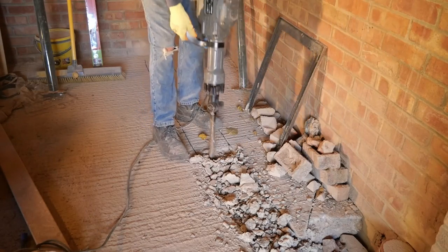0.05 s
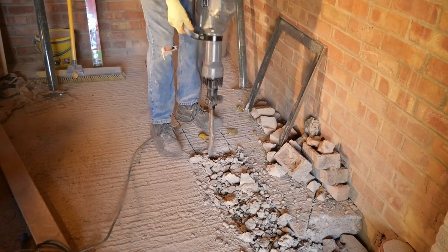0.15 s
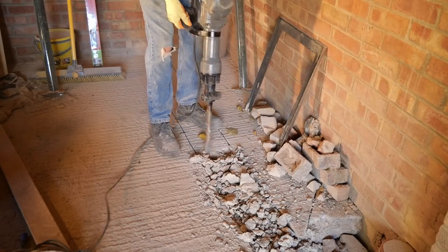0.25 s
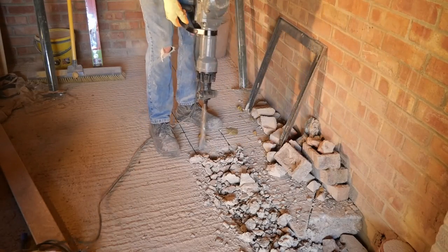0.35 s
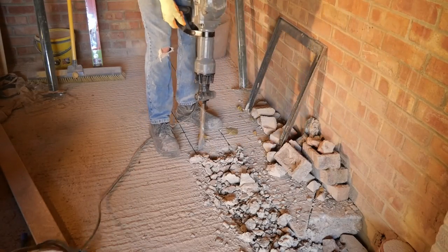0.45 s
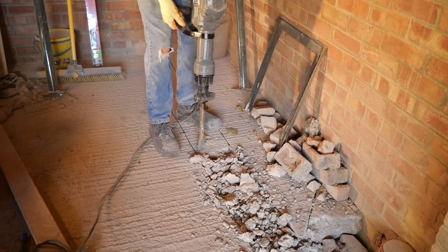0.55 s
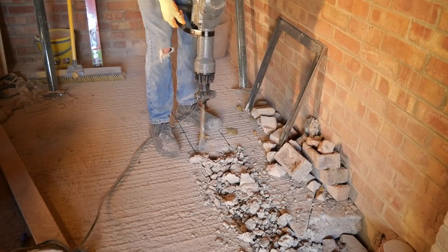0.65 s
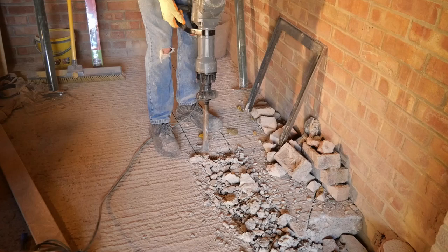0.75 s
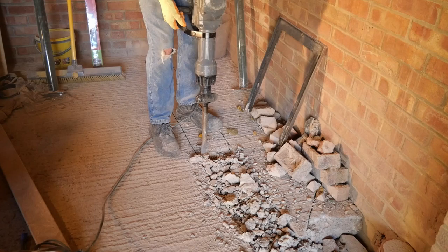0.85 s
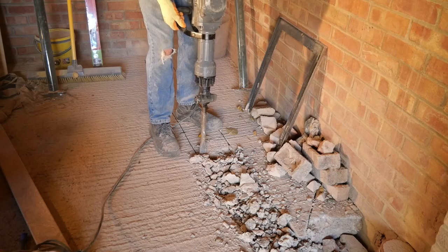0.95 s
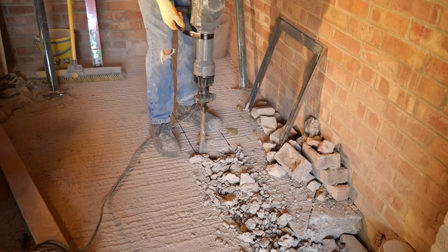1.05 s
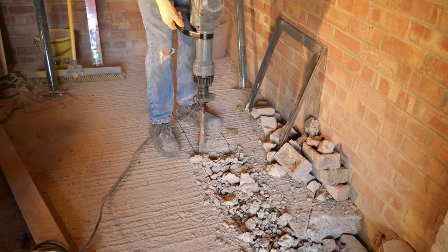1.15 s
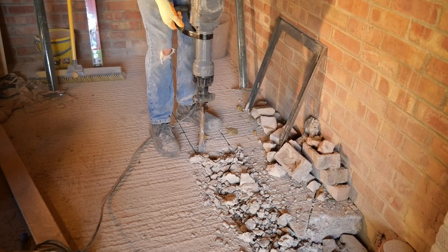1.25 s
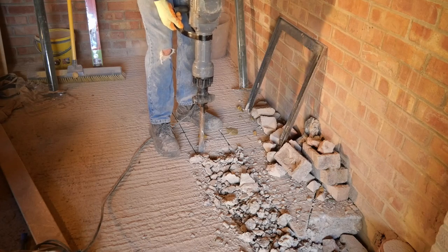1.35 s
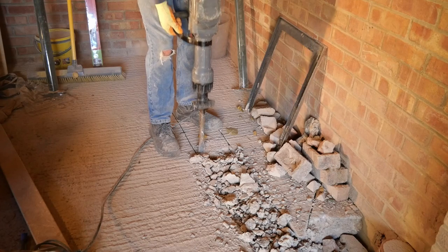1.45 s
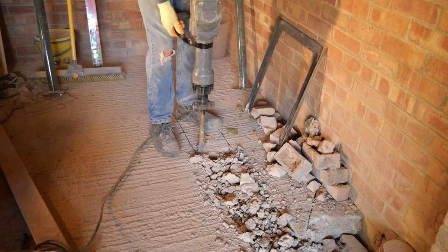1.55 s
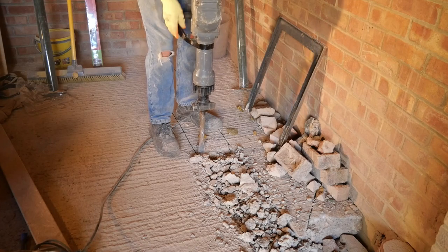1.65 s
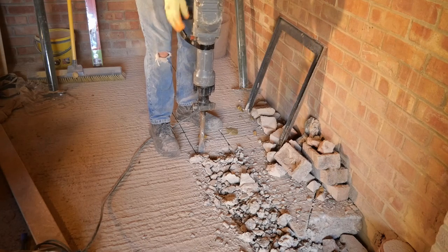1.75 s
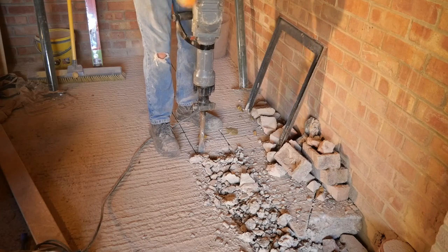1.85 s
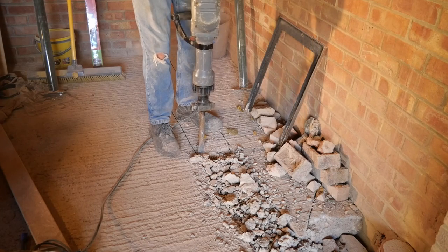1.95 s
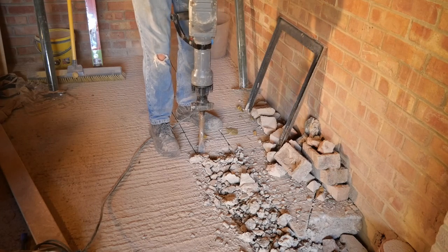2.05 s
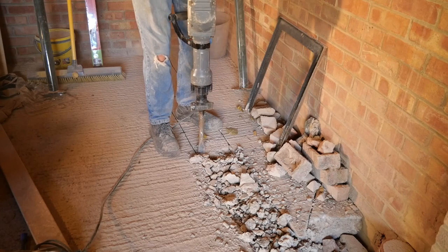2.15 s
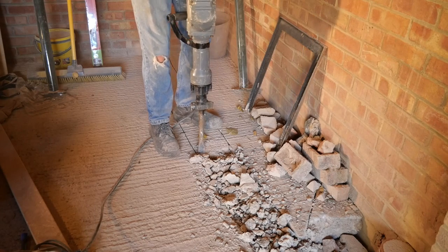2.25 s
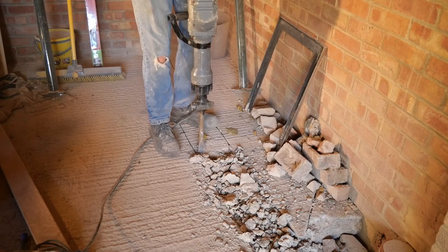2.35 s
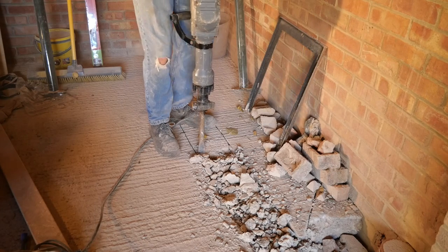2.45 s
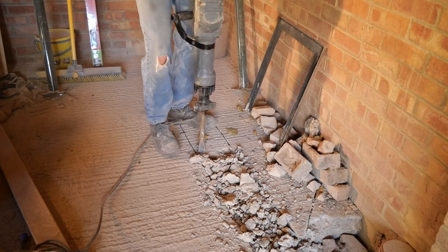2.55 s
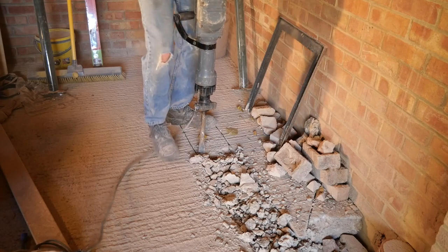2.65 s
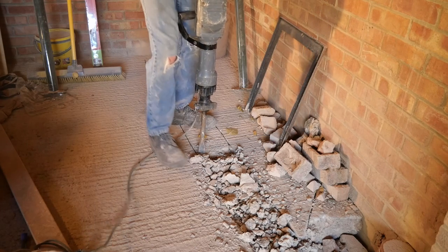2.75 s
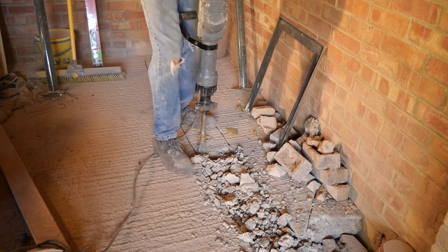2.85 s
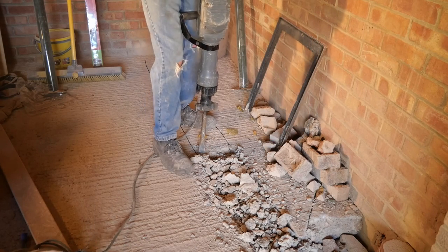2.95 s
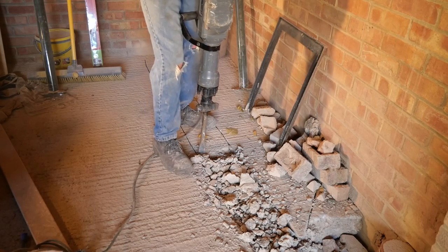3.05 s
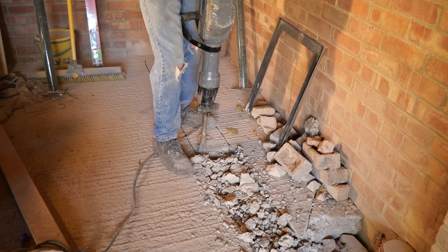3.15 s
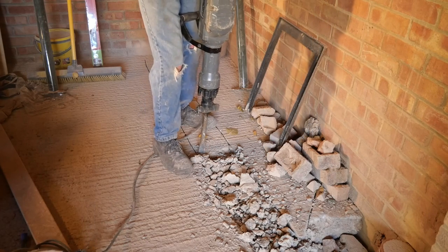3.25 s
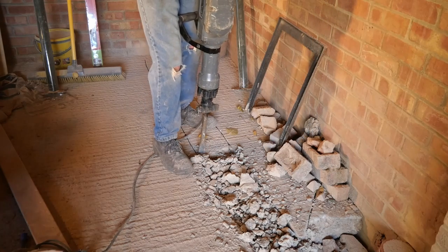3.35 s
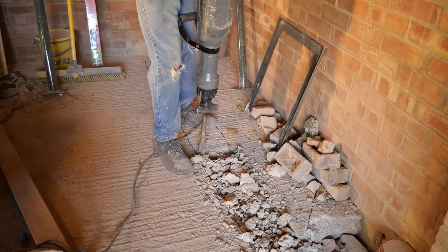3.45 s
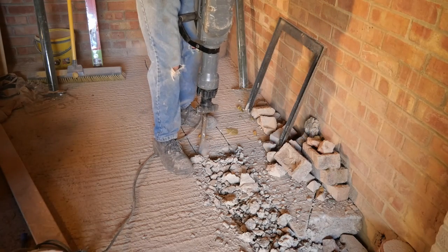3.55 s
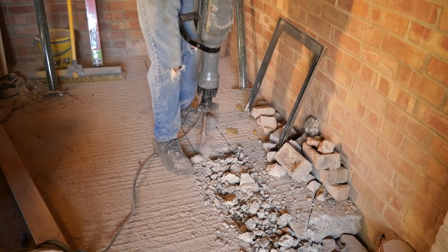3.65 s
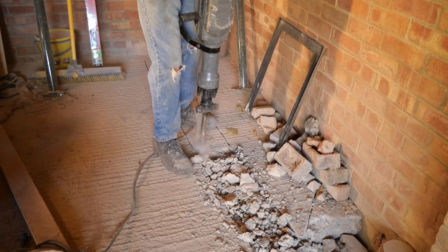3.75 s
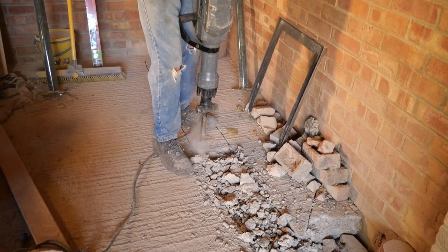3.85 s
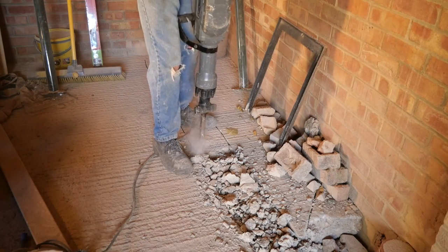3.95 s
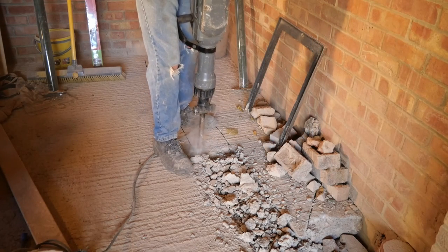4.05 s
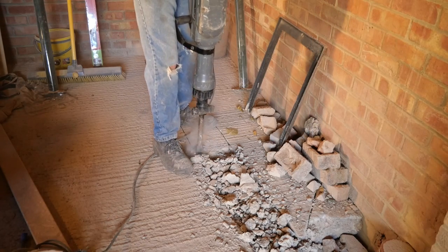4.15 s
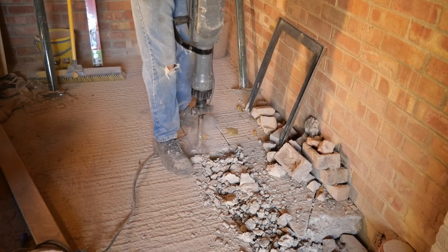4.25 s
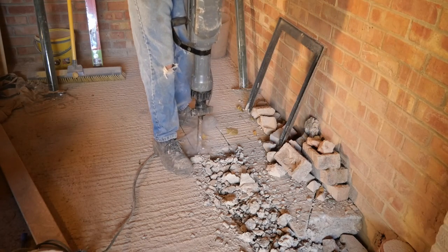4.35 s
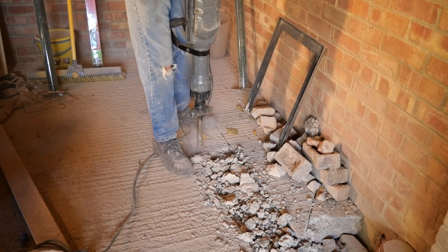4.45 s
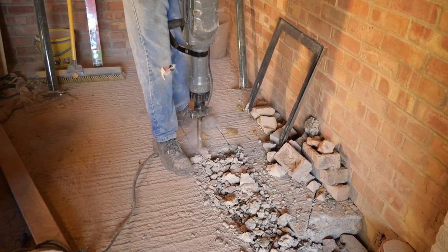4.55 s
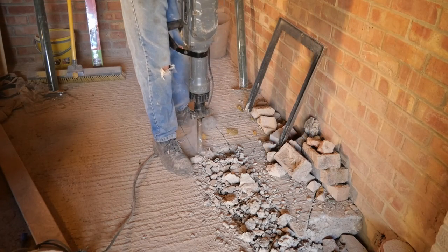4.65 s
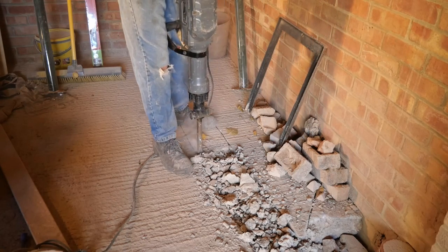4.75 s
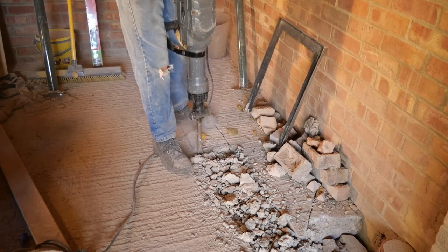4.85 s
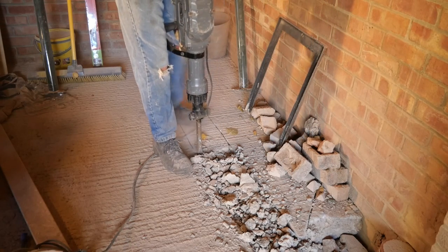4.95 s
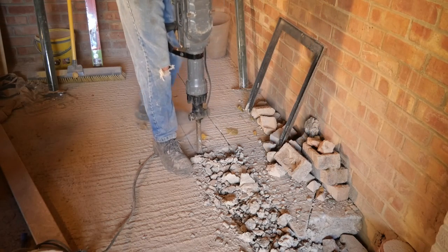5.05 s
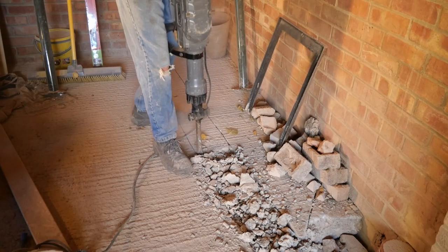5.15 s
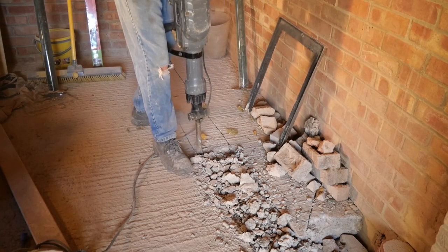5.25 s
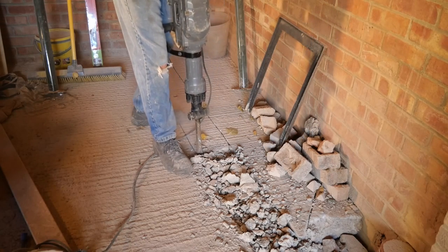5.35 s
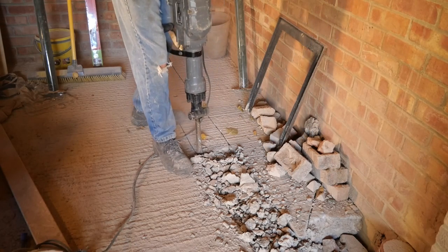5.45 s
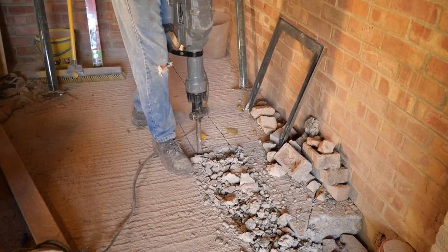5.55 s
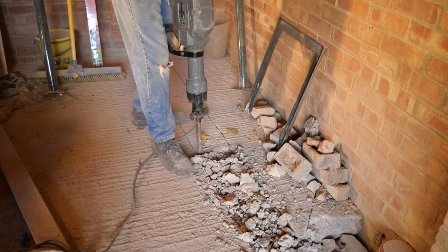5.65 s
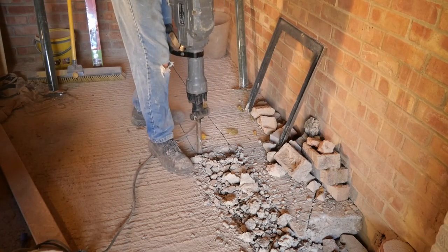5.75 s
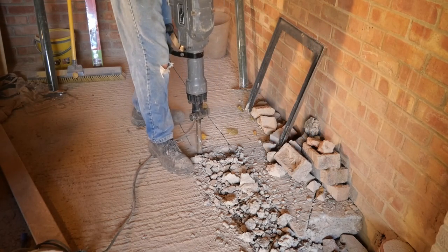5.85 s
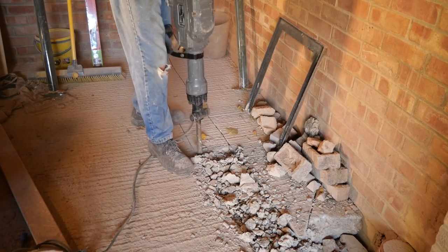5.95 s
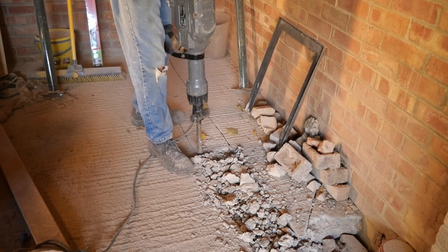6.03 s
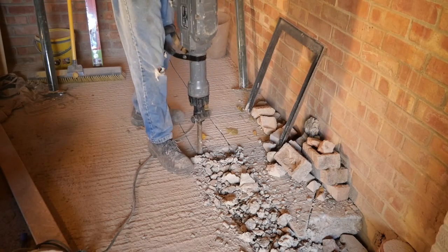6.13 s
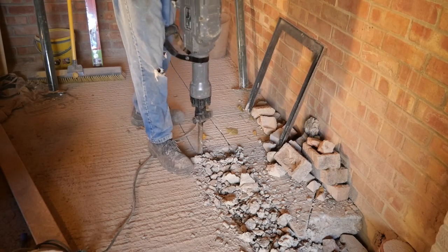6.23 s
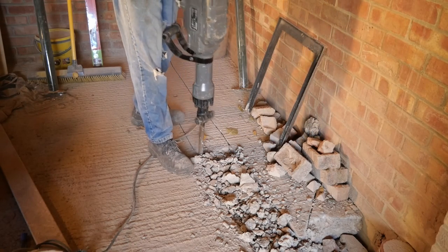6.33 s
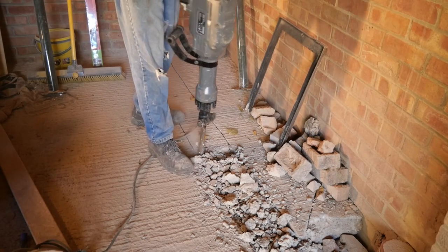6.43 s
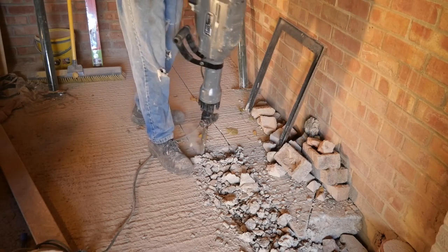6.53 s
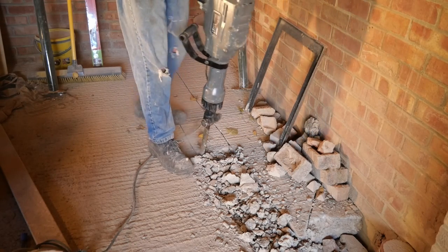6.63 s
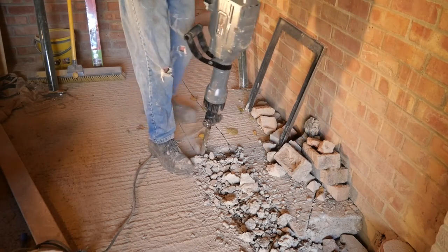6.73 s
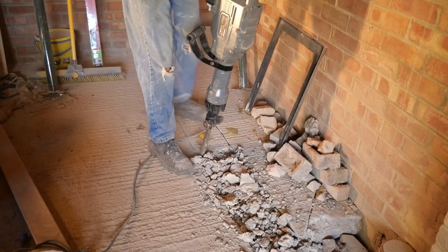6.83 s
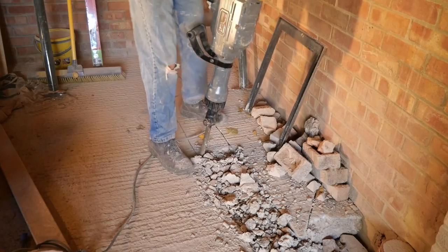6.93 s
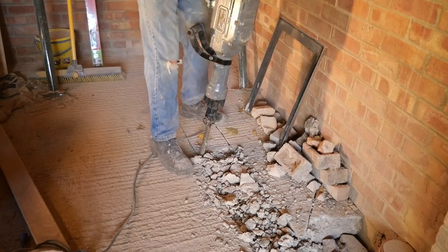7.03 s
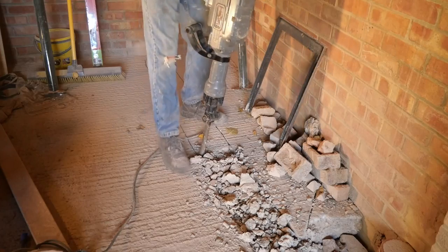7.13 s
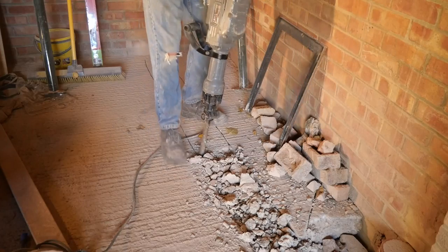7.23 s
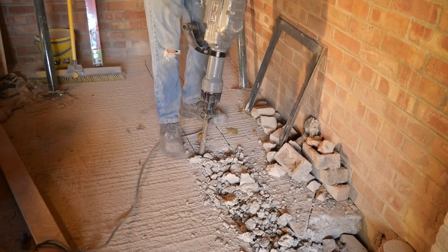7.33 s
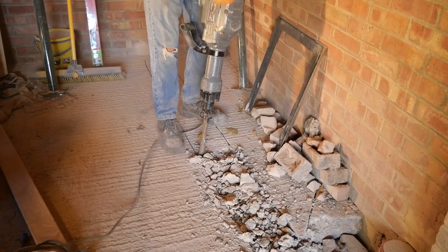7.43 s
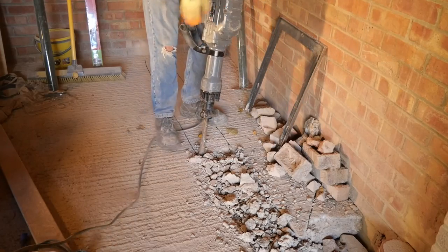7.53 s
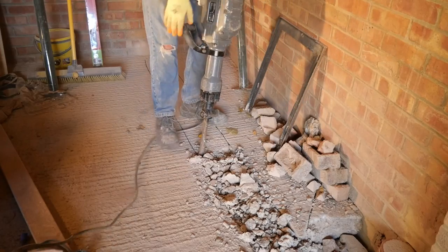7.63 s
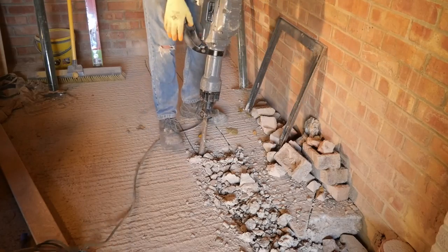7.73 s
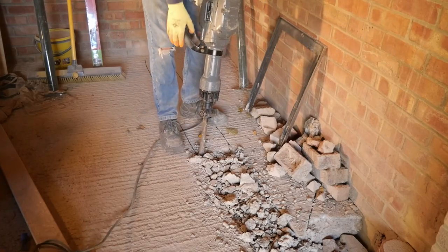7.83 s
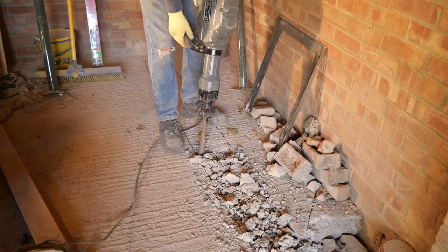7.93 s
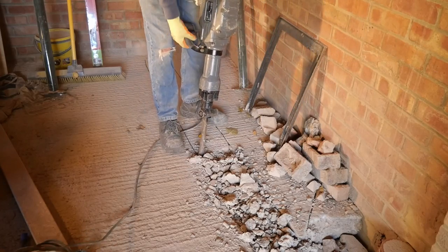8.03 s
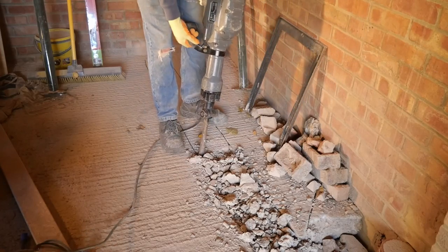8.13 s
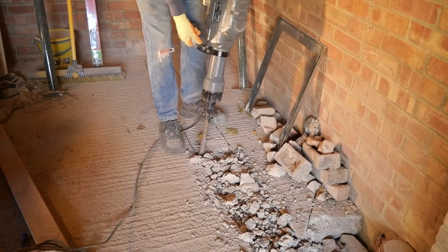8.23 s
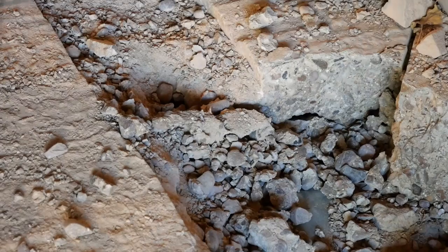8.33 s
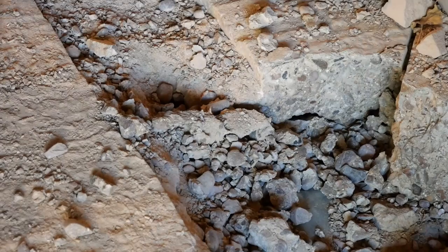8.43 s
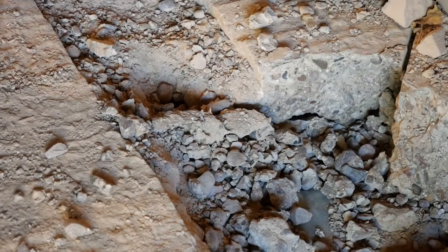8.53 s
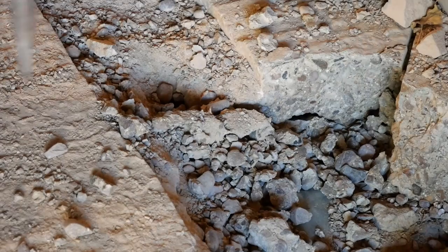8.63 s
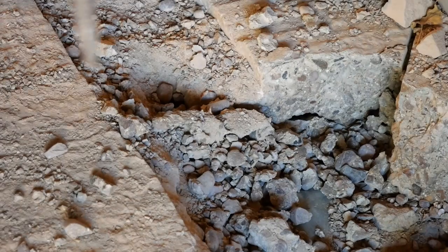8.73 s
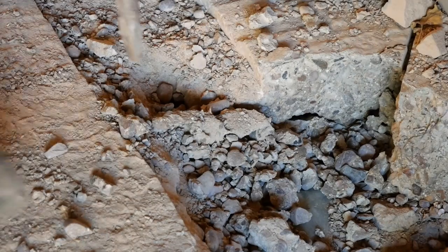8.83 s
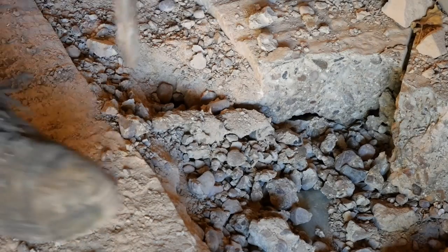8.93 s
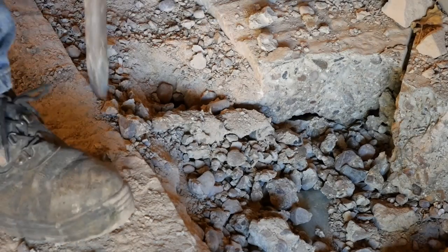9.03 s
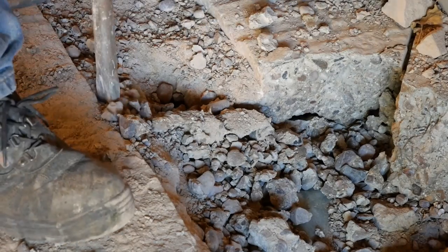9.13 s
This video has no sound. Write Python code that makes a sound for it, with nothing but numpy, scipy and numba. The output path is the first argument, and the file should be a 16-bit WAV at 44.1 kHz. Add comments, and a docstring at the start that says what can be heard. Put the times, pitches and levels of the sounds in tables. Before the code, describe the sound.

From 0 to 1.3 s, small dry gritty knocks and ticking stone chips, some with a light steel ping, as a breaker is shifted on a concrete floor in a brick garage; faint low hum beneath. At 1.55 s a much louder clack with a low thump. Sparse faint taps follow while the hum swells until 3.35 s. At 3.4 s sharp clunks and a very short motor groan near 500 Hz, then heavy first blows accelerate. From 3.6 to 6.8 s steady hammering, about 25 blows a second, thudding slab, ringing chisel, gear and fan noise, a thin faint squeal around 5 kHz. Blows slow from 6.8 to 7.35 s and stop. A knock at 7.6 s, then near silence with tiny fluttering ticks. From 8.35 s, closer, gravel slides; lumps crack at 8.45-8.6 s, crackling, and again more strongly at 8.95-9.15 s. Short, hard room reverberation.

```python
"""In a brick garage, an electric breaker is shifted about on the floor: gritty impacts over a swelling hum.
The motor groans into motion and a piston excites slab and chisel modes about 25 times a second, then slows.
Last, from closer, rubble is raked and cracks: filtered noise, random grains and short damped bursts.
Sparse decaying echoes form the room, and a noise gate lowers the quiet gaps, where short ticks imitate
its brief flutter."""
import sys
import numpy as np
from scipy import signal
from scipy.fft import rfft, irfft
from scipy.io import wavfile
from scipy.ndimage import uniform_filter1d
from numba import njit

SR = 44100
rng = np.random.default_rng(int(sys.argv[2]) if len(sys.argv) > 2 else 0)


def to_wav(sig):
    """Store sig (one row per channel, or 1-D mono) as 16-bit WAV at the path in sys.argv[1].

    Samples outside -1..1 are clipped; the rate is SR.
    """
    pcm = np.clip(np.atleast_2d(sig), -1, 1) * 32767
    pcm = np.round(pcm).astype(np.int16)
    wavfile.write(sys.argv[1], SR, pcm.T)  # frames by channels


N = 404838
T = np.arange(8192) / SR  # time axis of one short event [s]

# All levels in the tables are relative.
# hum and air of the garage: (time [s], hum level [dB], air level [dB])
QUIET_LEVELS = [(0, -74.5, -75.5), (.6, -71.5, -79), (1.2, -71.5, -79), (1.7, -76, -65), (2, -69, -74),
                (2.4, -66, -70.5), (2.9, -62.5, -67), (3.35, -53, -66), (3.6, -77.5, -72), (7, -84, -75.5),
                (7.7, -91.5, -76.5), (9.18, -100, -67.5)]
# mains hum partials: (frequency [Hz], level [dB])
HUM_PARTIALS = [(61.5, -12.5), (123, 0.5), (183, -16.5), (245, -20), (367, -15.5), (480, -22)]
# spectrum of the garage air: (frequency [Hz], level [dB])
AIR_SPECTRUM = [(18, -47), (30, -35), (64, -35), (88, -25.5), (122, -14.5), (253, -16.5), (368, -16),
                (623, -19), (4400, -36.5), (12000, -51), (15600, -100), (22000, -120)]
# knocks of chisel and boots, clunks of the starting motor, and the last blow: (time [s], level [dB],
# stone note [Hz], note above the grit [dB], low thump [dB], chisel ring [dB])
KNOCKS = [(0.086, -39, 1145, -9, -82, -73), (0.1, -38.5, 2490, -6, -81, -45.5),
          (0.138, -37.5, 2650, -7, -82, -66), (0.178, -51, 3080, 7, -84, -52),
          (0.36, -49, 790, -11, -79, -63), (0.448, -52, 2320, 0, -79, -60),
          (0.461, -37, 2330, -4, -59, -57), (0.534, -45, 2420, 5, -84, -60),
          (0.716, -41, 2320, -2, -74, -69), (0.73, -35.5, 2930, 7, -83, -59),
          (0.74, -32, 2180, -23, -85, -49), (0.941, -39, 4500, 4, -56, -43),
          (0.97, -34.5, 4600, 8, -55.5, -41), (1.01, -35, 4730, 0, -60, -46),
          (1.044, -33.5, 4440, 12, -69, -27.5), (1.056, -54, 4430, -2, -52, -52),
          (1.245, -51, 800, -2, -68, -68), (1.258, -43.5, 2850, 3, -68, -66),
          (1.499, -38, 2740, 4.5, -57, -77), (1.55, -16, 1990, -6, -27.5, -31),
          (2.108, -51.5, 2020, 2, -65, -75), (2.191, -42.5, 710, 10, -56.5, -83),
          (2.659, -51.5, 1370, 8, -60, -85), (2.843, -60, 720, 14, -52, -82),
          (2.937, -50, 704, 6, -37.5, -69), (3.396, -13.5, 4230, 3, -44, -34),
          (3.403, -16, 2900, 5, -67, -50), (3.425, -12, 4100, 3, -37, -44), (7.484, -43, 2600, 6, -75, -53),
          (7.611, -26.5, 3200, 0, -47.5, -40), (8.013, -65, 2000, -8, -85, -91),
          (8.058, -65, 1472, -6, -90, -90), (8.237, -52.5, 3220, -1, -78.5, -83.5)]
# first two blows on unbroken concrete, short and heavy: same columns as KNOCKS
FIRST_BLOWS = [(3.449, -4, 773, 9.2, -40.5, -56.5), (3.515, -12, 932, 10, -33.5, -56.5)]
# lumps of rubble cracking and tumbling: same columns as KNOCKS
LUMPS = [(8.423, -28.5, 1360, -8, -47, -65), (8.474, -18.5, 2440, 5, -36.5, -68),
         (8.512, -16.5, 2670, 7, -26, -65), (8.529, -23, 3050, 12.5, -34, -60),
         (8.548, -14, 3100, 7, -20.5, -34), (8.572, -11, 925, -20, -23.5, -34),
         (8.6, -13.5, 4250, 16, -52, -21), (8.608, -13, 1643, 4, -70, -27),
         (8.876, -27.5, 1450, 0, -50, -54), (8.958, -15, 1300, 3, -31.5, -75),
         (9.072, -12.5, 2190, -22, -33.5, -31), (9.11, -8, 2600, -15, -26, -26),
         (9.118, -11, 3540, 14.5, -44, -33.5), (9.134, -27.5, 1250, 19.5, -29, -54)]
# spectrum of stone on stone: (frequency [Hz], level [dB])
GRIT_SPECTRUM = [(250, -22.5), (700, 1.5), (2500, 2.5), (5000, -10), (10000, -23), (14000, -61.5)]
# stone chips ticking while things are shifted: (start [s], end [s], level [dB])
CHIP_SPANS = [(0, .3, -66), (0.353, .64, -64.5), (0.717, .87, -73), (0.9, 1.21, -64), (2.62, 2.8, -70.5)]
# the gate's brief flutter in the silences, imitated by short ticks: (start [s], end [s], level [dB])
GATE_FLUTTER_SPANS = [(.67, .71, -58), (1.19, 1.24, -58), (1.33, 1.49, -60), (7.74, 8.32, -58)]
# gravel crackling close by: (start [s], end [s], level [dB])
CRACKLE_SPANS = [(8.505, 8.66, -25), (8.95, 9.02, -41), (9.04, 9.18, -37)]
# motor groan on starting: (time [s], level [dB], pitch [Hz])
GROAN = [(3.394, -29, 492), (3.415, -26.5, 481), (3.432, -30, 500), (3.446, -31.5, 520),
         (3.452, -61.5, 515)]
# gears, fan and rattling chips: (time [s], level [dB])
MOTOR_LEVEL = [(3.394, -35), (3.45, -68), (3.6, -39.5), (4.2, -37), (5.3, -39), (6.3, -39.5), (6.8, -35.5),
               (7.1, -50), (7.4, -68), (7.75, -81)]
# their spectrum: (frequency [Hz], level [dB])
MOTOR_SPECTRUM = [(18, -67.5), (30, -23.5), (75, -17), (100, -24), (130, -11), (363, 3), (747, -8.5),
                  (917, 2), (1020, -5), (3970, -9.5), (4700, 0), (5700, -11.5), (6900, -11), (10300, -12),
                  (12300, -14), (14000, -91.5)]
# piston at full speed, each row on a blow, blows between rows evenly spaced: (time [s], strength [dB],
# low chisel ring [dB], ring of the 4.6 kHz mode [dB], high chisel ring [dB])
HAMMERING = [(3.61, -16, -31.5, -42, -23.5), (3.656, -20.5, -33.5, -41.5, -34),
             (3.695, -16.5, -45, -23, -27), (3.738, -29, -21.5, -45, -29), (3.818, -16.5, -34, -29, -30),
             (3.858, -20, -24, -30.5, -24), (3.938, -20.5, -24, -32.5, -30), (4.018, -18, -30, -29, -26),
             (4.137, -23.5, -27.5, -42, -27.5), (4.22, -26.5, -37, -44, -36), (4.261, -18.5, -36, -33, -31),
             (4.42, -20, -29.5, -43, -26.5), (4.535, -17.5, -42, -30, -31.5),
             (4.689, -18.5, -31, -39.5, -25.5), (4.768, -16.5, -24, -32, -27.5),
             (4.846, -25.5, -34.5, -33, -26.5), (4.884, -19, -27, -41, -26.5),
             (4.925, -18, -41, -49.5, -32), (4.965, -17, -30, -24, -30.5), (5.005, -17, -43, -37.5, -29.5),
             (5.125, -14.5, -59.5, -39.5, -32), (5.361, -13, -47, -52, -34.5),
             (5.56, -14.5, -40.5, -37.5, -31.5), (5.599, -14.5, -27.5, -37, -34.5),
             (5.642, -15.5, -34.5, -28, -29.5), (5.68, -14, -48, -46, -37), (5.838, -13.5, -33, -41, -26.5),
             (5.88, -16, -49, -43, -30.5), (5.998, -14, -36.5, -45.5, -33.5),
             (6.158, -14.5, -42, -39, -33.5), (6.199, -14.5, -26, -25.5, -32), (6.279, -15, -47, -42, -38),
             (6.32, -14.5, -36.5, -32, -27), (6.402, -24, -33, -42, -25), (6.442, -17, -30, -42, -31),
             (6.523, -16, -43, -55, -29), (6.772, -20, -36.5, -39, -29.5)]
# single blows while the motor speeds up and runs down: same columns as HAMMERING
SLOW_BLOWS = [(3.446, -16, -22.5, -30, -26.5), (3.513, -11.5, -25.5, -31, -28),
              (3.567, -19, -27.5, -28, -26), (6.824, -24.5, -33.5, -35.5, -30),
              (6.879, -21, -36.5, -38.5, -27.5), (6.947, -26, -45.5, -45.5, -26.5),
              (7.015, -18, -41, -45, -29), (7.097, -18.5, -36, -26.5, -28), (7.201, -20.5, -50, -40.5, -28),
              (7.339, -23.5, -47, -44, -44)]
# second knock as the striker rebounds: (time [s], level against the blow [dB])
REBOUND = [(3.4, -23), (3.7, -10), (4.5, -0.5), (5.2, -0.5), (6, -3.5), (6.8, -8), (7.4, -1)]
# how brittle the concrete under the point cracks: (time [s], level against the blow [dB])
BRITTLENESS = [(3.4, 1), (3.7, -28), (4.5, -10), (5.1, -12), (6.2, -7), (6.9, -9), (7.4, -4.5)]
# spectrum of the blow's thud: (frequency [Hz], level [dB])
THUD_SPECTRUM = [(24, -68.5), (40, -60), (75, -41.5), (100, -42.5), (125, -20.5), (163, -10), (326, -11.5),
                 (369, 1.5), (737, -7), (909, -7.5), (1010, -5), (4470, -9.5), (6000, -26), (7800, -57.5),
                 (13200, -120)]
# spectrum of cracking concrete: (frequency [Hz], level [dB])
CRACK_SPECTRUM = [(880, -42.5), (1500, 7), (1770, -18), (2040, 1.5), (4460, -0.5), (5950, -8), (7280, -4),
                  (10300, -23), (15000, -60)]
# steel bar modes: (frequency [Hz], width before stretching the decay [Hz], level [dB])
CHISEL_MODES = [(2420, 26, -5), (2485, 30, -8), (4297, 22, 0), (4375, 30, -6), (4647, 26, 0),
                (6437, 34, -7.5), (7050, 40, -10), (7212, 30, -8), (8940, 30, -7), (10028, 24, -8),
                (11920, 24, -9), (13700, 38, -20), (14750, 33, -20)]
# modes of slab and walls under the blow: same columns as CHISEL_MODES
SLAB_MODES = [(128, 17, -17.5), (165.5, 17, -11.5), (361.6, 18, -3), (413, 20, -5.5), (438.6, 11, -3.5),
              (512, 14, -4.5), (547, 51, -5), (676, 18.2, -2.5), (900.6, 17, -3.5), (925, 17, -3),
              (1117, 17, -3.5), (1279, 31, 2), (1447, 14, -1.5), (1565, 25, 4.5), (1645, 14, -2),
              (1986, 10, -11.5), (2182, 28, -5), (2968, 120, 11.5)]
# thin squeal drifting over the hammering: (time [s], level [dB], pitch [Hz])
SQUEAL = [(4.15, -56, 5100), (4.35, -51, 5110), (4.6, -43, 5150), (4.78, -42.5, 5400), (4.82, -73, 5070),
          (5.0, -45.5, 5100), (5.6, -43, 5300), (6.3, -61, 5130), (6.5, -59, 4900)]
# sliding gravel: (time [s], level [dB])
RAKE_LEVEL = [(8.324, -46.5), (8.46, -47), (8.52, -47.5), (8.7, -37), (8.8, -48.5), (8.95, -51),
              (9.04, -47), (9.1, -35), (9.18, -41)]
# its spectrum: (frequency [Hz], level [dB])
RAKE_SPECTRUM = [(24, -52), (40, -21.5), (351, -4.5), (1190, -9), (1430, -8), (1660, -8.5), (1820, -9),
                 (9450, -28), (12000, -33), (15600, -72), (22000, -120)]
# garage reverberation before each source's stretch: (frequency [Hz], 60 dB decay time [s])
GARAGE_DECAY = [(120, 0.43), (330, 0.27), (870, 0.21), (2300, 0.23), (6060, 0.17)]
# diffuse sound that differs left and right: (frequency [Hz], level [dB])
SIDE_SPECTRUM = [(60, -10.5), (150, -12), (380, -11.5), (950, -6.5), (2380, -7.5), (5960, -13.5),
                 (15000, -9.5)]
# microphone mismatch, left over right: (frequency [Hz], level [dB])
LEFT_OVER_RIGHT = [(60, -4), (180, -0.5), (550, 2.5), (1640, 0.5), (4960, 0.0), (15000, 0)]
# microphone response: (frequency [Hz], level [dB])
MICROPHONE = [(30, -16.5), (60, -10.5), (104, -6), (120, -1), (9500, -0.5), (11500, -12.5), (13000, -31),
              (15500, -19.5)]

BLOWS_PER_S = 25.1
JITTER_S, STRENGTH_SCATTER_DB, LOW_SCATTER_DB, HIGH_SCATTER_DB = 0.00055, 0.34, 2.5, 1.5
REBOUND_S, REBOUND_JITTER_S = 0.0105, 0.0003
LOW_RING_STRETCH, HIGH_RING_STRETCH = 2.7, 2.8  # decay-time factors of the steel
DETUNE, FLUTTER_DB = 0.0015, 1.8  # relative pitch scatter of any mode; flutter of the steel's ring
CHIPS_PER_S, TICKS_PER_S, CRACKLE_PER_S, CHIP_SCATTER_DB = 96, 70, 400, 4
KNOCK_GRIT_DB, CRACK_GRIT_DB, CHIP_SPREAD_DB, KNOCK_RING_SCATTER_DB = 5.5, 4.5, 6, 2
GROAN_ROUGH, SQUEAL_ROUGH = 0.4, 0.7  # rms waver relative to the mean
GATE_OPEN_DB, GATE_DEPTH_DB, EDGE_HZ = -69.5, 19, 15558


def gain_of(db):
    """Logarithmic level law: 20 dB is a factor of ten in amplitude."""
    return 10 ** (np.asarray(db) / 20)


def evened(x):
    """Normalization to unit root-mean-square over the whole array."""
    return x / np.sqrt(np.mean(x ** 2) + 1e-20)


def read(points, hz):
    """Linear interpolation along a logarithmic frequency axis."""
    f, value = np.transpose(points)
    return np.interp(np.log(hz + 1), np.log(f + 1), value)


def coloured(x, points):
    """Spectral filtering: multiplies the transform by a frequency-dependent gain."""
    n = x.shape[-1]
    gain = gain_of(read(points, np.fft.rfftfreq(n, 1 / SR)))
    return irfft(rfft(x) * gain, n)


def curve(rows, column=1):
    """Piecewise-linear envelope: one column at every sample, -200 outside it."""
    rows = np.array(rows)
    return np.interp(np.arange(N) / SR, rows[:, 0], rows[:, column], -200, -200)


def add(mix, s, sound):
    """Linear superposition: adds a sound in place at s seconds."""
    part = mix[round(s * SR):][:len(sound)]
    part += sound[:len(part)]


def burst(points, t60, grit_db, rise_s=0.00044):
    """Damped impact noise: coloured, with a fast rise, exponential decay and random grit."""
    grit_level = evened(uniform_filter1d(rng.standard_normal(len(T)), 60))
    grit = gain_of(grit_db * grit_level)
    noise = evened(coloured(rng.standard_normal(len(T)), points))
    shape = gain_of(-60 * T / max(t60, 0.004)) * (1 - np.exp(-T / rise_s))
    return evened(noise * grit * shape) * np.sqrt(np.mean(shape ** 2))


def rung(modes, gains_db, scatter_db, stretch, wander):
    """Modal superposition: struck, damped sines with scattered strengths, pitches and phases."""
    hz, width, db = np.transpose(modes)[:, :, None]
    strength_luck, phase_luck = rng.standard_normal((2, len(modes), 1))
    decay_db = -60 * T * width / (1.11 * stretch)  # wide modes die sooner
    size = gain_of(db + gains_db + scatter_db * strength_luck + decay_db)
    hz = hz * (1 + DETUNE * rng.standard_normal(hz.shape))
    partials = size * np.sin(2 * np.pi * hz * T + wander * phase_luck)
    return partials.sum(0) * (1 - np.exp(-T / 0.0007))


def quiet():
    """Hum as a sum of wavering sine partials; air as broadband noise partly shared by both channels."""
    t = np.arange(N) / SR
    slow = uniform_filter1d(rng.standard_normal((len(HUM_PARTIALS), N)), 3000)
    waver = evened(uniform_filter1d(slow, 3000))
    hum = np.zeros(N)
    for (hz, db), w in zip(HUM_PARTIALS, waver):
        hum += gain_of(db + 1.4 * w) * np.sin(2 * np.pi * hz * t + 0.25 * w)
    mid, side = evened(coloured(rng.standard_normal((2, N)), AIR_SPECTRUM))
    air = np.array([mid + 0.37 * side, mid - 0.3 * side])
    hum_gain = np.sqrt(2) * gain_of(curve(QUIET_LEVELS))
    return hum_gain * hum + gain_of(curve(QUIET_LEVELS, column=2)) * air


def knocks(rows, t60, grit_db, thump_hz, ring_modes, ring_gain_db, note_spread, ring_scatter_db, dull_db=0):
    """Impact of rough bodies: contact grit, a short note, a low thump and steel modes."""
    out = np.zeros(N)
    spectrum = GRIT_SPECTRUM[:3] + [(4200, 0)] + GRIT_SPECTRUM[3:]
    grit = [(hz, db - dull_db * (hz >= 5000)) for hz, db in spectrum]
    thump = [(thump_hz / 4, -40), (thump_hz / 2, -14), (thump_hz, 0),
             (thump_hz * 3.9, -3), (thump_hz * 6, -25), (3000, -50)]
    tilt_db = -0.1 * np.arange(len(ring_modes))[:, None]
    for s, db, hz, note_db, thump_db, ring_db in rows:
        note = [(hz / 2, -40), (hz / note_spread, -12), (hz, 0), (hz * note_spread, -12), (hz * 2, -40)]
        note_t60 = 0.61 * t60 * np.sqrt(2200 / hz)  # higher notes die sooner
        contact = burst(grit, t60, grit_db) + gain_of(note_db) * burst(note, note_t60, 0.31)
        tap = gain_of(db - 8.5) * contact
        tap += gain_of(thump_db - 1.5) * burst(thump, 0.16, 0.96, 0.00069)
        ring = rung(ring_modes, ring_db + ring_gain_db + tilt_db, ring_scatter_db, 0.55, 3.2)
        add(out, s, tap + ring)
    return out


def chips(spans, per_s, t60):
    """Random point process: independent ticks share one grit burst but vary in size."""
    t = np.arange(N) / SR
    size = gain_of(CHIP_SCATTER_DB * rng.standard_normal(N))
    level = sum(gain_of(db) * ((t > a) & (t < b)) for a, b, db in spans)
    ticks = level * size * (rng.random(N) < per_s / SR)
    return signal.oaconvolve(ticks, burst(GRIT_SPECTRUM, t60, 2.1))[:N]


def gate_flutter():
    """Random point process: short ticks imitate the gate's brief flutter in the silences."""
    return chips(GATE_FLUTTER_SPANS, TICKS_PER_S, 0.0044)


def contacts():
    """Contact excitation: knocks of chisel and boots, motor clunks, first and last blows, ticking chips."""
    taps = knocks(KNOCKS, 0.037, KNOCK_GRIT_DB, 130, CHISEL_MODES, -3.0, 1.5, KNOCK_RING_SCATTER_DB)
    heavy = knocks(FIRST_BLOWS, 0.0045, 3.2, 330, CHISEL_MODES, -1.5, 2.1, 4.5)
    return taps + heavy + chips(CHIP_SPANS, CHIPS_PER_S, 0.016)


def tone(rows, rough):
    """Frequency modulation: phase integrates the pitch curve while noise modulates the amplitude."""
    turns = np.cumsum(np.maximum(curve(rows, column=2), 0)) / SR
    waver = 1 + rough * evened(uniform_filter1d(rng.standard_normal(N), 200))
    return gain_of(curve(rows)) * waver * np.sin(2 * np.pi * turns)


def rattle(rows, colour, grains_per_s, spread_db, share):
    """Granular modulation: random decaying clicks roughen filtered noise."""
    sizes = gain_of(spread_db * np.minimum(rng.exponential(1, N), 4))
    clicks = (rng.random(N) < grains_per_s / SR) * sizes
    grains = signal.oaconvolve(clicks, gain_of(-60 * T[:400] / 0.00075))[:N]
    rough = rng.standard_normal(N) * (1 - share + share * evened(grains))
    return gain_of(curve(rows)) * evened(coloured(rough, colour))


def motor():
    """Mechanical noise: gears, fan and rattling chips as granular broadband sound."""
    return rattle(MOTOR_LEVEL, MOTOR_SPECTRUM, 1200, CHIP_SPREAD_DB, 0.32)


def piston():
    """Periodic excitation with scatter, joined by the slow blows at both ends."""
    rows = np.array(HAMMERING)
    steps = np.round(np.diff(rows[:, 0]) * BLOWS_PER_S)
    number = np.append(0, np.cumsum(steps))
    every = np.arange(number[-1] + 1)
    run = np.array([np.interp(every, number, column) for column in rows.T]).T
    # no two blows land alike
    scatter = [JITTER_S, STRENGTH_SCATTER_DB, LOW_SCATTER_DB, LOW_SCATTER_DB, HIGH_SCATTER_DB]
    run = run + rng.standard_normal(run.shape) * scatter
    return sorted(list(run) + SLOW_BLOWS, key=lambda row: row[0])


def shock(points):
    """Minimum-phase principle: the most compact causal pulse with a given spectrum, peak 1."""
    hz = abs(np.fft.fftfreq(len(T), 1 / SR))
    log_gain = np.log(gain_of(np.maximum(read(points, hz), -100)))
    pulse = np.fft.ifft(np.exp(np.conj(signal.hilbert(log_gain)))).real
    return pulse / abs(pulse).max()


def hammer():
    """Impulsive excitation: thud, crack and rebound as noise; slab and chisel respond in their modes."""
    noise, rings = np.zeros(N), np.zeros(N)
    steel_hz = np.array(CHISEL_MODES)[:, :1]
    third, high = steel_hz == 4647, steel_hz > 5500
    scatter_db = np.where(high, 4.5, 2.6)
    stretch = np.where(high, HIGH_RING_STRETCH, LOW_RING_STRETCH)
    # the piston's own dull shock is alike every time; crushed grit carries little bass
    strike = shock([(hz, db - 16 * (hz > 2000)) for hz, db in THUD_SPECTRUM])
    crunch = [(hz, db - 9 * (hz < 600)) for hz, db in THUD_SPECTRUM]
    habit = burst(crunch, 0.0092, 0.7, 0.0009)  # the same point meets the same slab
    blows = piston()
    nexts = [row[0] for row in blows[1:]] + [N / SR]
    for (s, blow_db, low_db, third_db, high_db), next_s in zip(blows, nexts):
        again_s = s + REBOUND_S + REBOUND_JITTER_S * rng.standard_normal()
        again_db = blow_db + np.interp(s, *np.transpose(REBOUND))
        brittle = gain_of(np.interp(s, *np.transpose(BRITTLENESS)))
        for at, db in (s, blow_db), (again_s, again_db):
            crack = brittle * burst(CRACK_SPECTRUM, 0.035, CRACK_GRIT_DB, 0.0002)
            fresh = burst(crunch, 0.021, 0.38, 0.0013)
            thud = gain_of(-5.0) * (2.36 * strike + 0.7 * habit + 0.78 * fresh)
            add(noise, at + 0.001902, gain_of(db) * thud)
            add(noise, at + 0.0033, gain_of(db) * crack)
        # the ring's level flutters at random throughout
        flutter_db = FLUTTER_DB * evened(uniform_filter1d(rng.standard_normal(len(T)), 250))
        # the next blow grips the steel and stops the ring
        grip_db = -700 * np.maximum(T - (next_s - s), 0)
        levels_db = np.where(high, high_db, np.where(third, third_db, low_db))
        ring = rung(CHISEL_MODES, levels_db, scatter_db, stretch, 3.64)
        steel = gain_of(grip_db + flutter_db) * ring
        slab = rung(SLAB_MODES, blow_db - 13.5, 1.3, 1.3, 0.5)
        add(rings, s + 0.0022, steel + slab)
    return noise, rings


def rubble():
    """Friction and fracture: sliding gravel as granular noise, lumps and crackle as damped impacts."""
    lumps = knocks(LUMPS, 0.038, 3.3, 343, CHISEL_MODES[8:10], 0.5, 1.66, 7.7, dull_db=7)
    raked = rattle(RAKE_LEVEL, RAKE_SPECTRUM, 1500, 3.4, 0.3)
    return lumps + raked + chips(CRACKLE_SPANS, CRACKLE_PER_S, 0.0076)


def garage(x, wet_db, longer, gap_s):
    """Reverberation: sparse random echoes after a gap, decaying at a rate set by frequency."""
    taps = np.zeros((4, SR // 2))
    at = np.arange(round(gap_s * SR), SR // 2 - 20, 20)
    at = at + rng.integers(0, 20, (4, len(at)))
    np.put_along_axis(taps, at, rng.choice([-1., 1.], at.shape), 1)
    hz, t, z = signal.stft(taps, SR, nperseg=256)
    decay = gain_of(-60 * t / (longer * read(GARAGE_DECAY, hz)[:, None]))
    tail = signal.istft(z * decay, SR, nperseg=256)[1]
    tail = tail * (np.arange(tail.shape[1]) > gap_s * SR) / np.linalg.norm(tail[0])
    # the echo pattern drifts slowly between two sets of tails, for every source
    turn = 2 * np.pi * 0.12 * np.arange(N) / SR
    fed = x * np.array([np.cos(turn), np.sin(turn)] * 2)
    wet = gain_of(wet_db) * signal.oaconvolve(fed, tail, axes=1)[:, :N]
    mid = wet[0] + wet[1]
    side = gain_of(2.0) * coloured(wet[2] + wet[3], SIDE_SPECTRUM)
    return np.array([x + mid + side, x + mid - side])


def scene():
    """Superposition of the far breaker, the close rubble, the quiet garage and the imitated gate flutter."""
    touched = contacts()
    blows, rings = hammer()
    rings = rings + tone(GROAN, GROAN_ROUGH) + tone(SQUEAL, SQUEAL_ROUGH)
    room = garage(touched, -1.2, 1.07, 0.0045)
    room += garage(blows + motor(), -2.0, 1.6, 0.004)
    room += garage(rings, -2.5, 1.0, 0.004)
    room += garage(rubble(), -4.0, 1.19, 0.003)
    return room + quiet() + gate_flutter()


@njit
def gate_db(level_db, open_db, depth_db, opening, closing):
    """Downward gating: the gain rises fast above the threshold and falls steadily below it."""
    out, now = np.empty_like(level_db), -depth_db
    for i in range(len(level_db)):
        now = min(now + opening, 0.) if level_db[i] > open_db else max(now - closing, -depth_db)
        out[i] = now
    return out


def record(dry):
    """Transduction chain: microphone mismatch and response, level-driven gate, then a low-pass."""
    left = coloured(dry[0], [(hz, db / 2) for hz, db in LEFT_OVER_RIGHT])
    right = coloured(dry[1], [(hz, -db / 2) for hz, db in LEFT_OVER_RIGHT])
    heard = coloured(np.array([left, right]), MICROPHONE)
    # 5 ms mean power, mostly of past samples
    power = abs(uniform_filter1d((heard ** 2).mean(0), 220, origin=100))
    level_db = 10 * np.log10(power + 1e-14)
    # opens at 6000 dB/s, closes at 1400 dB/s
    gain_db = gate_db(level_db, GATE_OPEN_DB, GATE_DEPTH_DB, 6000. / SR, 1400. / SR)
    gated = heard * gain_of(gain_db)
    low_pass = signal.firwin(511, EDGE_HZ, window=("kaiser", 9), fs=SR)
    return signal.oaconvolve(gated, low_pass[None], "same")


dry = scene()
out = record(dry)
to_wav(out)
```